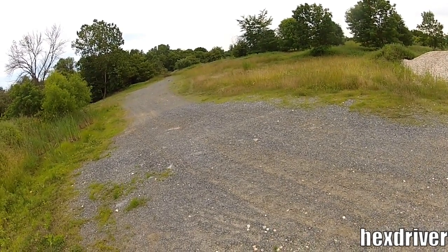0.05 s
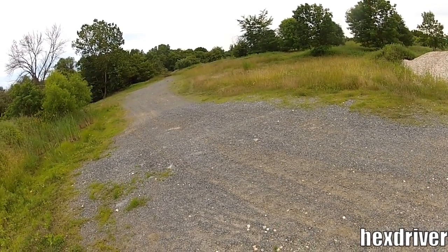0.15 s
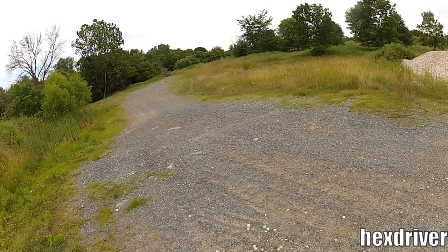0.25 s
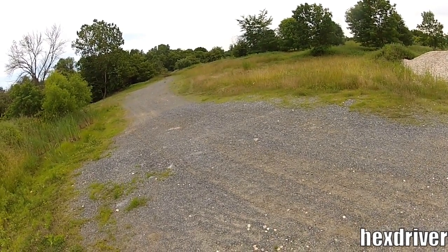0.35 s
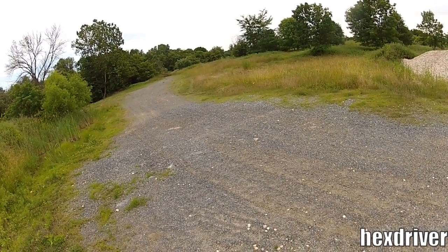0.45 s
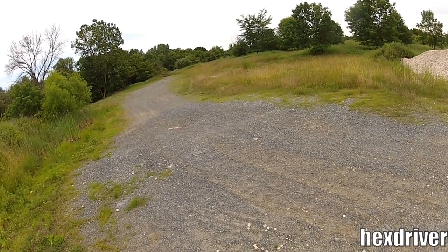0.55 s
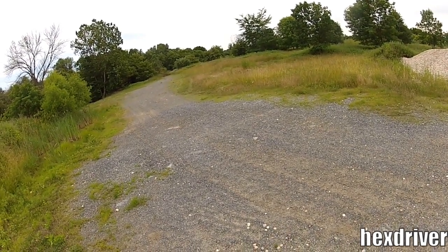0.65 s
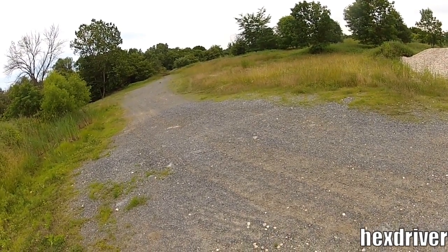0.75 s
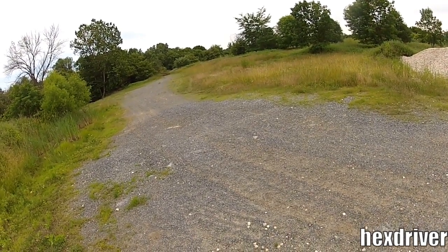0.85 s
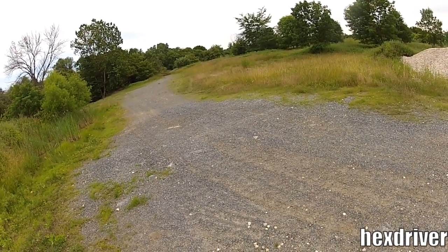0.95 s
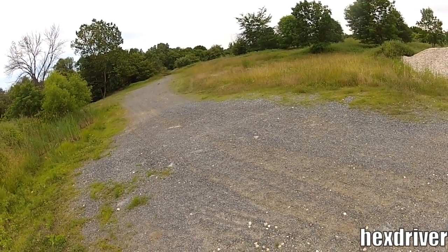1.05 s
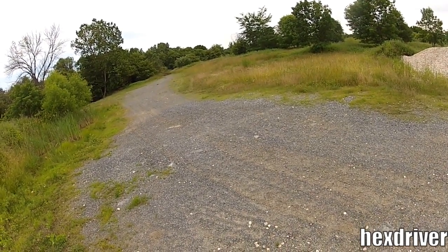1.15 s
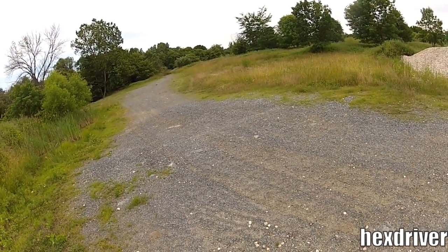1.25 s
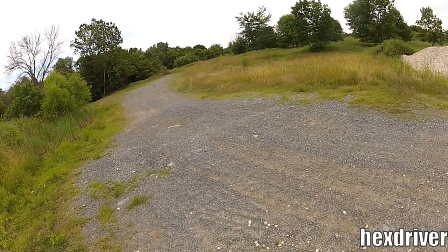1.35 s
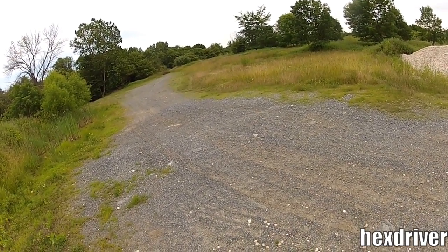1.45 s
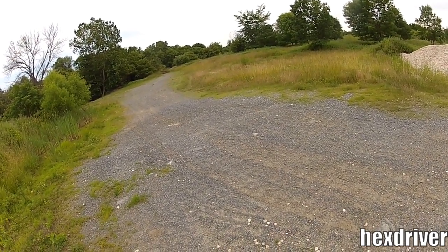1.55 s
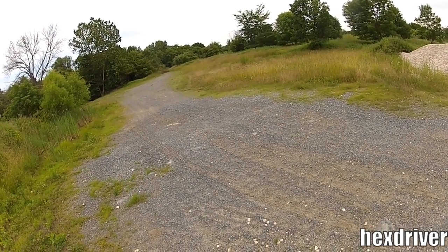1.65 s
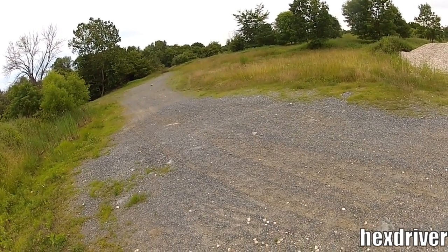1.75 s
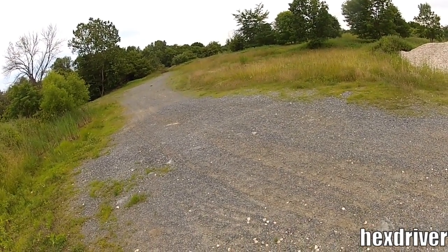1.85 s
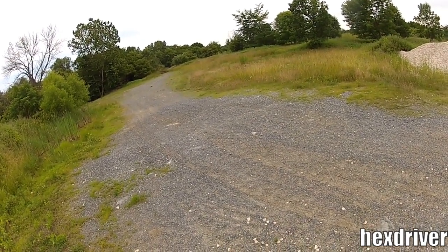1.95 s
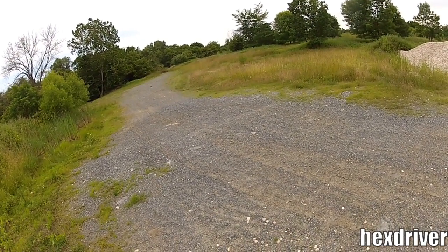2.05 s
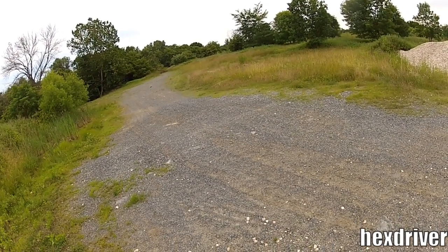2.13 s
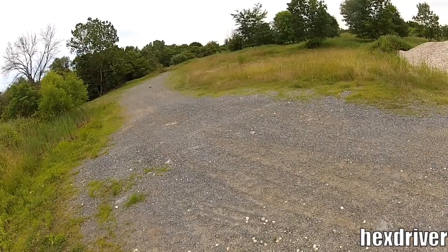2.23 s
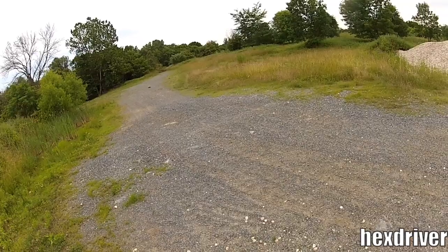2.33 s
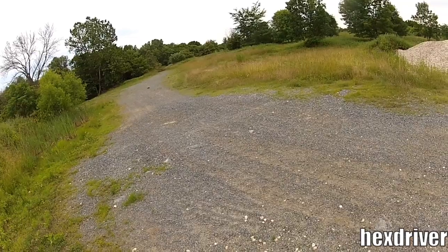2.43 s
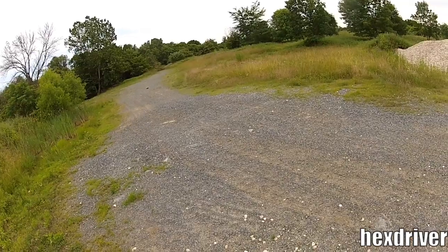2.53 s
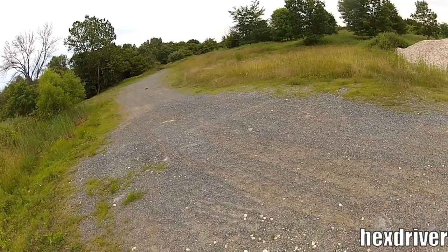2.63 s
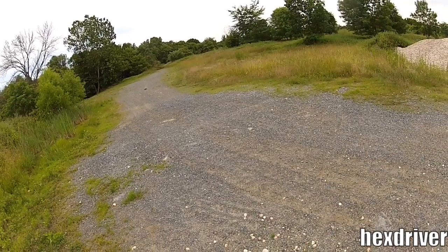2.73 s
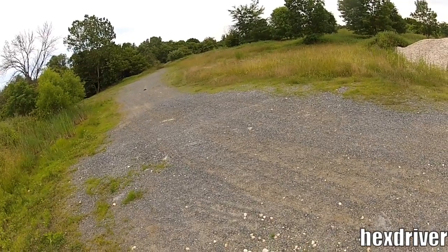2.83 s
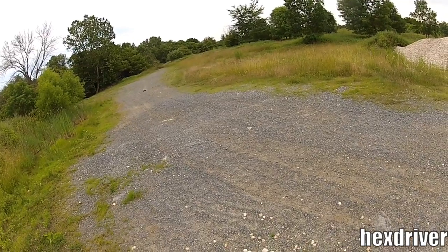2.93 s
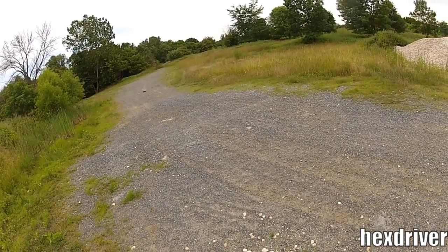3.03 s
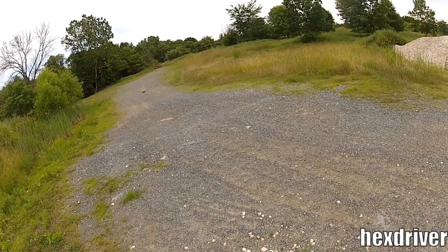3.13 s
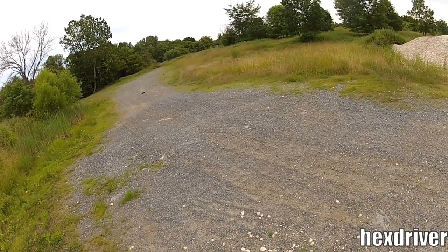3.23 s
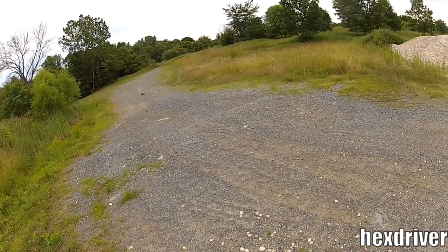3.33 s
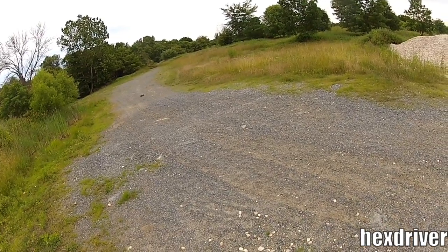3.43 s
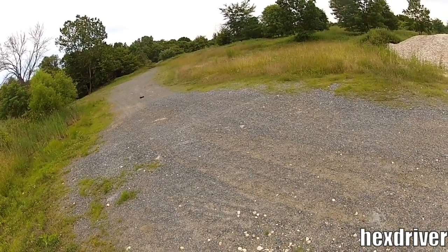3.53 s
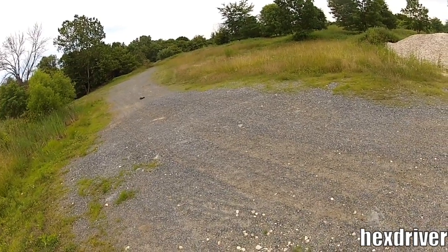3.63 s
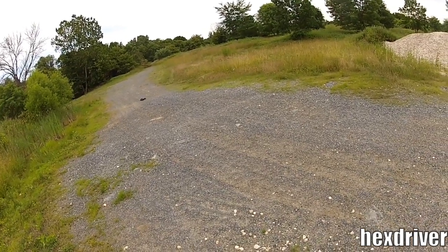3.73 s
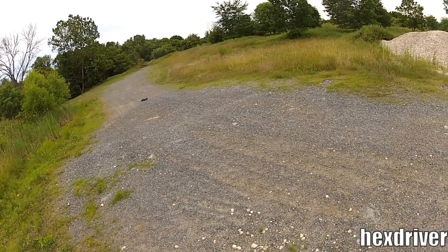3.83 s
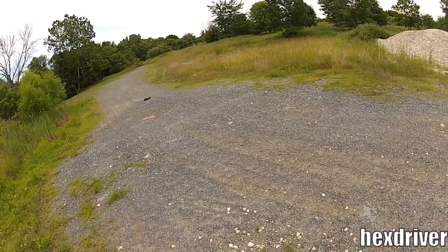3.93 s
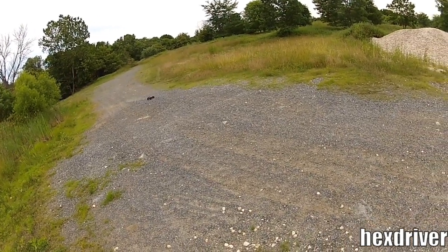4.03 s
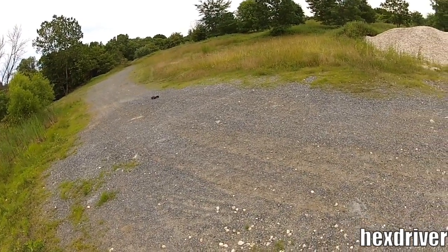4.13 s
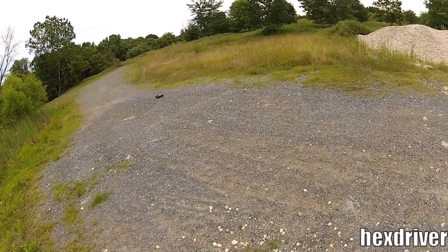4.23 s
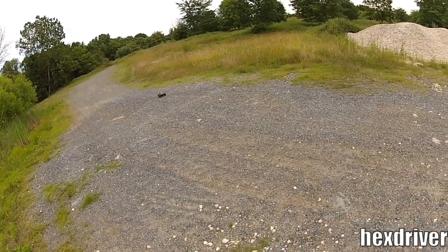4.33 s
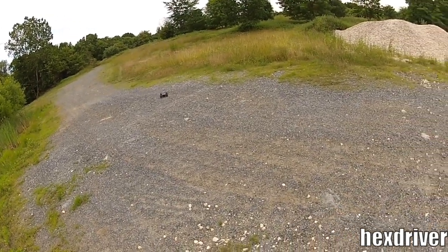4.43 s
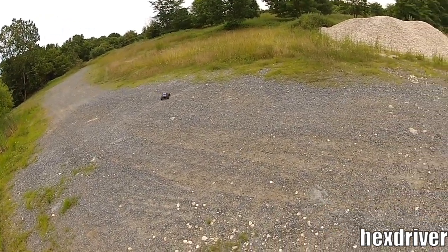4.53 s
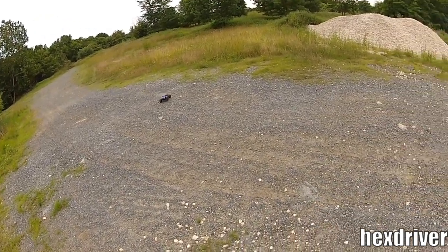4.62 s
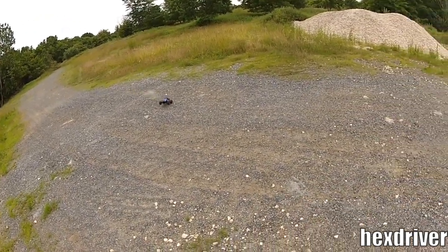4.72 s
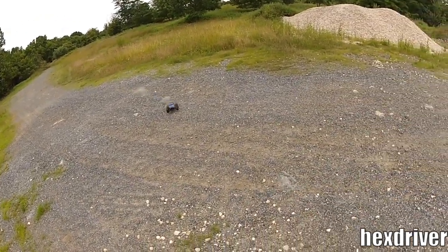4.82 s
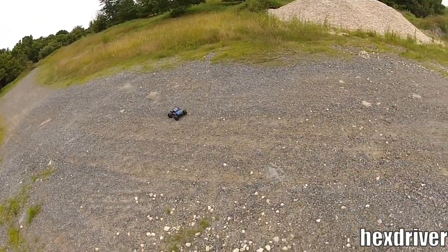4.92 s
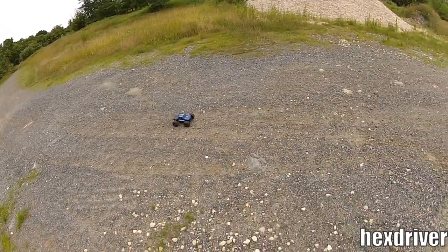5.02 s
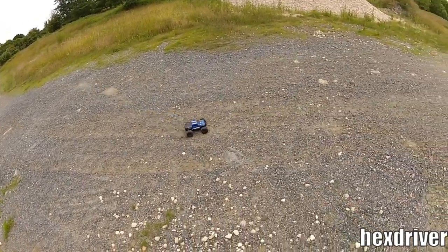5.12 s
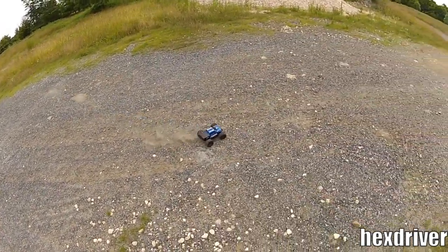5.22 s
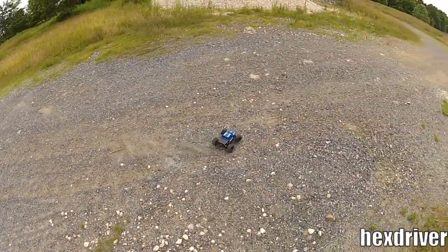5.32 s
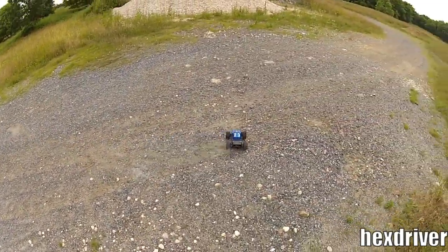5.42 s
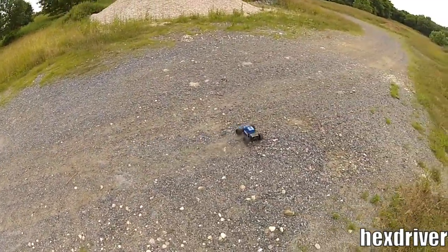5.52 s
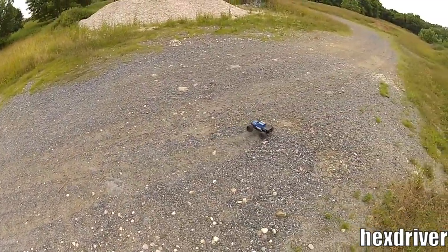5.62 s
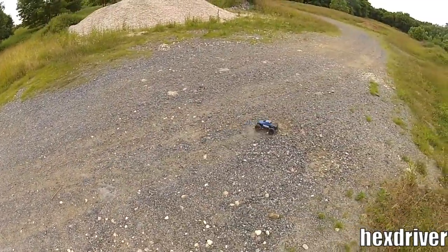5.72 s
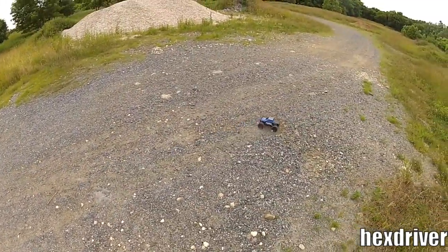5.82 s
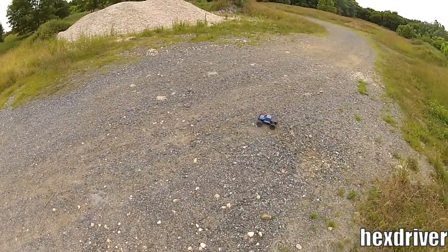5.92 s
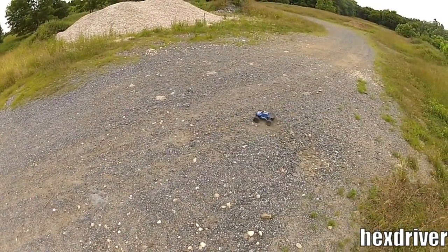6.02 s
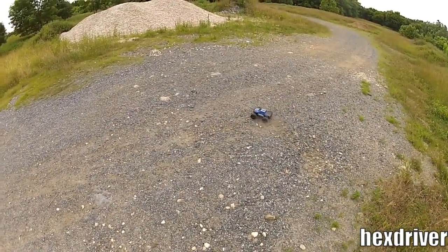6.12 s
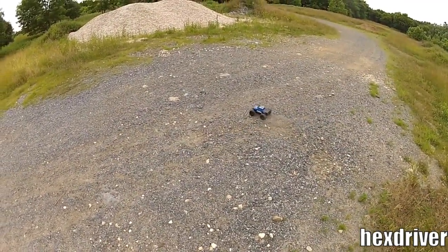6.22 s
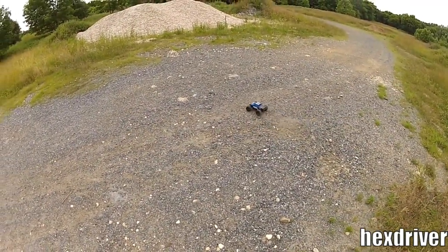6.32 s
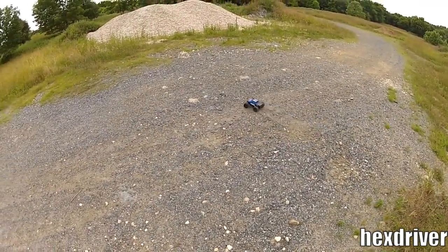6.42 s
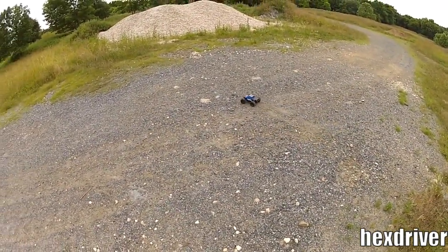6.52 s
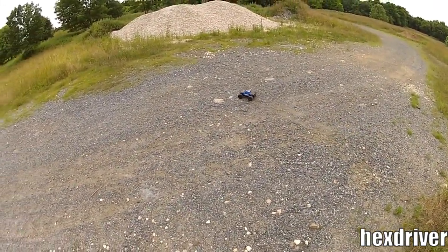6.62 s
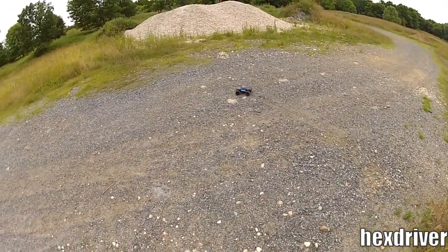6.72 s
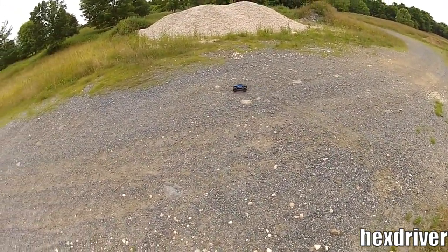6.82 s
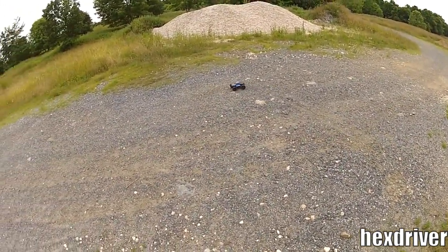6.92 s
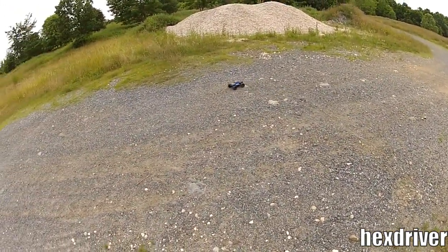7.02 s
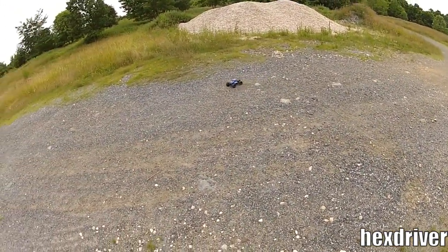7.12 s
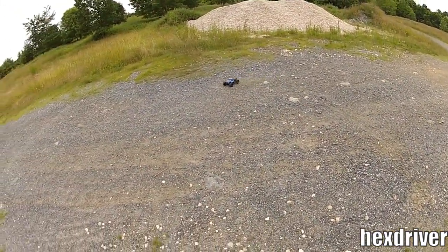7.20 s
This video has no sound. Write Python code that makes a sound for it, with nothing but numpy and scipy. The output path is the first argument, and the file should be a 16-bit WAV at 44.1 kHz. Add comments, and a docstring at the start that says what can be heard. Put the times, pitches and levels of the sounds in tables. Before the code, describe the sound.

Open field, faint low air rumble with a little insect hiss. From 0 to 2.2 s a songbird gives quick, tiny rising and falling whistles, ending in soft level calls, while a thin, very fast high trill runs until about 4.7 s, with louder double accents from 3.4 s. A faint low hum swells at the start and again around 2 s. Beneath, a small truck's hollow tyres drum softly far away, growing with light bumps from 2 s. From 4 s it rushes nearer; at 4.6 s crunch and hollow rattle jump up. Between 5 and 6.3 s it is closest: heavy stone crunch, hard short thuds at 5.1, 5.4, 5.5, 5.9 and 6.0, dry pebble snaps, brief dips as wheels hop. From 6.4 s it recedes unevenly, still rattling at 7.25 s. Dry outdoor sound, coarse camera treble.

```python
"""A small electric model truck comes in from far off over loose gravel, passes close and draws away.
Random stone contacts ring its hollow tyres and crunch under them; it hops, slams onto bumps and flings
pebbles at its chassis. Gliding whistles make a songbird and a thin trill at the field's edge, over a
faint low hum and filtered-noise open air. The camera's microphone holds each sample at a low rate."""
import sys
import numpy as np
from scipy import signal
from scipy.fft import rfft, irfft
from scipy.io import wavfile
from scipy.ndimage import map_coordinates

SR = 44100
rng = np.random.default_rng(int(sys.argv[2]) if len(sys.argv) > 2 else 0)


def wrap_up_sound(samples):
    """Save the sound to the file named by the first command line argument, as 16-bit audio."""
    columns = np.atleast_2d(samples).T
    # keep every value between -1 and 1, then stretch to whole-number steps
    tamed = np.clip(columns, -1, 1)
    steps = np.round(tamed * 32767).astype(np.int16)
    wavfile.write(sys.argv[1], SR, steps)


N = 320166
TIME = np.arange(N) / SR

# the drive, as speed and distance set it: (time [s], drumming level before trim [dB], crunch level [dB])
DRIVE = [(0, -54, -81), (1.0, -50.5, -72.5), (1.95, -48.5, -65), (2.15, -46.5, -60.5), (3.3, -41, -55),
         (3.9, -35.5, -52.5), (4.42, -37, -53), (4.65, -29, -42.5), (5.03, -31, -46.5), (5.25, -28.5, -42),
         (5.55, -27.5, -41.5), (5.75, -31, -47), (5.98, -30, -40), (6.2, -28, -42.5), (6.48, -32.5, -48),
         (6.62, -29, -45), (6.95, -36, -48), (7.26, -33, -44.5)]
# truck nearness: (time [s], share of near tyre colour [0-1], fine grit level above the crunch [dB])
NEARNESS = [(0, 0.33, -31), (3.8, 0, -17), (4.35, 0.38, -11.5), (4.8, 0.93, -9), (5.1, 0.68, -7),
            (5.45, 1, -2.5), (5.8, 0.47, 1), (6.1, 0.9, -7.5), (6.35, 0.57, -5), (6.7, 0.54, -4.5),
            (7.26, 0.53, -7.5)]
# hops: (take-off time [s], landing time [s], drumming level change [dB], crunch level change [dB])
HOPS = [(2.399, 2.614, -5.5, -3.5), (3.276, 3.303, -8, -6), (3.515, 3.565, -13, -5.5),
        (4.07, 4.172, -5, -4.5), (4.405, 4.439, -7.5, -6), (4.547, 4.602, -10.5, -8.5),
        (4.732, 4.791, -17, -6), (4.879, 4.888, -14.5, 2), (5.59, 5.628, -9, -1.5),
        (5.657, 5.768, -8.5, -2), (5.883, 5.914, -5.5, -7), (6.54, 6.573, -16.5, -4),
        (6.868, 7.022, -3, -2), (7.073, 7.091, 1.5, 0)]
# tyres dig into loose patches: (time [s], length [s], drumming level change [dB], crunch level change [dB])
# a dig shorter than its edge reaches only part of the change
DIGS = [(1.087, 0.035, 6.5, 6), (1.27, 0.13, 4, -12.5), (1.522, 0.029, 9, 5), (1.799, 0.018, 11.5, 9),
        (2.049, 0.029, 8, -3), (2.342, 0.021, 8, 2), (2.602, 0.063, 3.5, 6.5), (3.379, 0.044, 3.5, 2.5),
        (3.486, 0.056, 6, 4.5), (3.606, 0.012, 0, 1.5), (3.792, 0.018, 1, 0), (4.291, 0.057, 9, 6),
        (4.477, 0.034, 2.5, 8.5), (4.7, 0.022, 2, 11), (4.821, 0.085, 3, 1.5), (4.92, 0.059, 1.5, 2),
        (5.158, 0.081, 6, 3.5), (5.27, 0.034, 2.5, 4), (6.093, 0.021, -3, 5), (6.561, 0.03, 3, 2),
        (7.01, 0.023, 4.5, 0)]
# wheels slam onto bumps: (time [s], peak level before trim [dB])
BUMPS = [(1.923, -30), (1.95, -30.5), (2.349, -25.5), (2.778, -25.5), (2.918, -26.5), (3.096, -29),
         (3.204, -25), (3.612, -21), (3.736, -23), (3.78, -29), (4.213, -21), (4.354, -20.5), (5.09, -12.5),
         (5.358, -10), (5.534, -12.5), (5.87, -15), (6.02, -15), (6.264, -22), (6.51, -23), (7.155, -21.5)]
# pebbles strike the chassis: (time [s], peak level before trim [dB], resonance [Hz])
PEBBLES = [(4.481, -27.5, 2110), (4.7, -28, 2440), (5.193, -22, 3300), (5.23, -18.5, 2420),
           (5.329, -18, 3700), (5.359, -25.5, 2800), (5.5152, -15.5, 4080), (5.552, -21.5, 3120),
           (5.58, -27, 2840), (5.695, -37, 3030), (5.796, -18, 3200), (5.779, -29, 2860),
           (5.909, -29, 4420), (6.022, -23.5, 2480), (6.11, -26.5, 4730), (6.362, -38, 4400),
           (6.867, -22, 2740)]
# ring of the hollow tyres, close to the microphone: (frequency [Hz], relative level [dB])
TYRE_NEAR = [(30, -37), (70, -25), (130, -15.5), (200, -11.5), (270, -7), (325, -2), (385, -1), (460, -3),
             (540, -7), (660, -9), (800, -14), (1050, -15.5), (1500, -27), (2500, -45)]
# ring of the hollow tyres, far off: (frequency [Hz], relative level [dB])
TYRE_FAR = [(30, -26), (100, -12), (200, -5.5), (280, -4), (325, 1), (380, 1.5), (470, -7), (560, -5.5),
            (680, -7), (850, -15), (1050, -25.5), (1500, -29.5), (2500, -48)]
# colour of stones grinding on each other: (frequency [Hz], relative level [dB])
CRUNCH = [(500, -15), (950, 3), (1300, 3), (1700, -6), (2050, 0.5), (2500, 4.5), (2900, 1.5), (3200, -4),
          (3600, -18), (4200, -24), (5800, -29)]
# colour of the finest grit: (frequency [Hz], relative level [dB])
GRIT = [(2500, -29), (3400, 0), (4100, -2.5), (4500, -0.5), (5000, -2.5), (5500, -12), (6000, -10)]
# reflection off the ground: (time [s], lag [ms], reflected share [0-1])
GROUND = [(0, .7, .2), (3.8, .76, .35), (4.35, .79, .5), (4.8, .82, .5), (5.1, .87, .5), (5.5, .87, .5),
          (5.8, .86, .2), (6.1, .85, .3), (6.35, .68, .2), (6.7, .72, .45), (7.0, .76, .55),
          (7.26, .77, .45)]
# pitches that every songbird sweep runs between: (low [Hz], high [Hz])
SONG_HZ = (3095, 4900)
# songbird's rising sweeps: (time [s], length [s], middle pitch [Hz], level [dB])
UPSWEEPS = [(0.73, .03, 3640, -63), (.757, .02, 3900, -64), (.886, 0.024, 4150, -61),
            (1.122, .025, 4250, -58.5), (1.309, .031, 4200, -56), (1.682, 0.034, 3700, -58),
            (1.875, .034, 3850, -59)]
# songbird's falling sweeps: (time [s], length [s], middle pitch [Hz], level [dB])
DOWNSWEEPS = [(.209, .047, 4150, -59), (0.5, .045, 4220, -59), (1.174, 0.048, 3680, -57.5),
              (1.371, .042, 3650, -59.5), (1.65, .045, 4340, -61), (1.694, 0.016, 4020, -57),
              (1.893, .015, 4100, -60)]
# soft, level calls that end the song: (time [s], length [s], pitch [Hz], level [dB])
SOFT_CALLS = [(2.058, .024, 4050, -61), (2.11, 0.028, 3230, -62), (2.21, .05, 3340, -67)]
# thin, fast trill in the grass: (time [s], syllable rate [1/s], level before scatter [dB])
TRILL = [(0, 26, -60), (1.0, 27, -62.5), (1.8, 31, -60.5), (2.4, 28, -62), (3.0, 27.7, -58.5),
         (3.6, 28, -59.5), (4.4, 24, -64), (4.7, 22, -64)]
# the trill's accents, two loud syllables each: (time [s], level [dB])
ACCENTS = [(3.421, -54.5), (3.739, -52.5), (4.047, -52.5), (4.299, -50), (4.59, -51)]
# low, distant hum: (time [s], length [s], start [Hz], middle [Hz], end [Hz], level before wavering [dB])
HUM = [(0.0, 0.573, 65.3, 76.2, 79, -51), (1.706, 0.89, 94.3, 100.8, 88.5, -55)]
# colour of the open air: (frequency [Hz], relative level [dB])
AIR = [(20, -13), (40, -7.5), (65, 0.5), (90, -0.5), (130, -3.5), (220, -8), (400, -21.5), (700, -23.5),
       (1100, -41), (2000, -29), (3700, -35.5), (4500, -32.5), (5050, -23.5), (5500, -27.5), (6000, -32.5)]


def rolling(clump_db=3, fine_clump_db=2.5, jolt_db=1.85, bounce_db=1.1, drumming_trim_db=0.5):
    """Stones drum on the hollow tyres and grind on each other; the jolting wheel load drives both."""
    drum_db, crunch_db = wheel_load()
    load = undb(jolt_db * walk(55))
    near = curve(NEARNESS).clip(0, 1)
    knocks = contacts(rate=3000, spread_db=2)
    near_tyres = near * unit(ring(knocks, TYRE_NEAR))
    far_tyres = (1 - near) * unit(ring(knocks, TYRE_FAR))
    # the soft tyres bounce on the uneven ground
    bounce = bounce_db * walk(36).clip(-2, 1.5)
    drumming = (near_tyres + far_tyres) * undb(drum_db + bounce + drumming_trim_db)
    # stones give way in small clumps, each a few milliseconds long
    clumps = undb(clump_db * walk(260).clip(-2.2, 2.2))
    crunch = unit(ring(contacts(rate=4500, spread_db=1.5) * clumps, CRUNCH))
    # the finest ticks only carry over a short distance
    fine_clumps = undb(fine_clump_db * walk(330).clip(-2.2, 2.2))
    ticks = contacts(rate=5000, spread_db=7.0) * fine_clumps
    grit = unit(ring(ticks, GRIT)) * undb(curve(NEARNESS, axis=2))
    return load * (drumming + (crunch + grit) * undb(crunch_db))


def wheel_load(hop_edge_s=0.0058, dig_edge_s=0.02):
    """Drumming and crunch levels in dB follow the drive and change as wheels hop or dig in."""
    drum_db, crunch_db = curve(DRIVE), curve(DRIVE, axis=2)
    for start, end, drum_change, crunch_change in HOPS:
        hop = window(start, end, hop_edge_s)
        drum_db, crunch_db = drum_db + drum_change * hop, crunch_db + crunch_change * hop
    for start, length, drum_change, crunch_change in DIGS:
        dig = window(start, start + length, dig_edge_s)
        drum_db, crunch_db = drum_db + drum_change * dig, crunch_db + crunch_change * dig
    return drum_db, crunch_db


def bumps(decay_s=0.0047, rattle=0.13, landing_db=11, trim_db=-2.5):
    """A bump or landing is one firm push and a quick rattle of stones into the tyres."""
    out, t = np.zeros(N), np.arange(4096) / SR
    drive_db = curve(DRIVE)
    # before trim, a landing peaks landing_db above the drive's drumming level
    landings = [(end, np.interp(end, TIME, drive_db) + landing_db) for _, end, _, _ in HOPS]
    for start, db in BUMPS + landings:
        push = rattle * rng.standard_normal(len(t)) * np.exp(-t / decay_s)
        push[0] += 1
        # soft rubber spreads the push over about a millisecond
        soft_push = np.convolve(push, np.hanning(40))
        thud = ring(soft_push, TYRE_NEAR)
        add(out, start, thud / np.abs(thud).max() * undb(db + trim_db))
    return out


def pebbles(skid_s=0.0012, trim_db=-3):
    """Each pebble gives a dry snap: it skids and bounces for a few milliseconds on one broad resonance."""
    out, t = np.zeros(N), np.arange(1024) / SR
    skid = t * np.exp(-t / skid_s)
    for start, db, hz in PEBBLES:
        chassis = [(hz / 4, -28), (hz / 1.6, -13), (hz / 1.15, -5), (hz, 0),
                   (hz * 1.15, -7), (hz * 1.4, -17), (hz * 3, -34)]
        snap = ring(skid * rng.choice([-1, 1], len(t)), chassis)
        # start 1 ms early, as the skid takes a moment to build
        add(out, start - .001, snap / np.abs(snap).max() * undb(db + trim_db))
    return out


def ground_echo(x):
    """The gravel returns the treble inverted and a little late, so notches slide as the truck moves."""
    high_pass = signal.butter(2, 800, "high", fs=SR, output="sos")
    treble = signal.sosfiltfilt(high_pass, x)
    lag_samples = curve(GROUND) * SR / 1000
    late_treble = map_coordinates(treble, [np.arange(N) - lag_samples], order=1)
    return x - curve(GROUND, axis=2) * late_treble


def songbird():
    """A songbird whistles quick sweeps between two pitches, then soft level calls."""
    out, (low_hz, high_hz) = np.zeros(N), SONG_HZ
    for start, length, middle_hz, db in UPSWEEPS:
        add(out, start, undb(db) * whistle(length, low_hz, middle_hz, high_hz))
    for start, length, middle_hz, db in DOWNSWEEPS:
        add(out, start, undb(db) * whistle(length, high_hz, middle_hz, low_hz))
    for start, length, hz, db in SOFT_CALLS:
        add(out, start, undb(db) * whistle(length, hz, hz, hz))
    return out


def trill(pitch_scatter=0.0216, scatter_db=2.5, late_s=0.0014):
    """A run of tiny falling syllables, scattered in time, pitch and level, plus steady accents."""
    out, fall_hz = np.zeros(N), np.array([5330, 5030, 4780])
    # a syllable starts each time the running count passes a whole number
    count = np.cumsum(curve(TRILL)) / SR
    starts = np.flatnonzero(np.diff(np.floor(count)))
    starts = starts[starts < TRILL[-1][0] * SR]
    db = curve(TRILL, axis=2)
    for i, (late, pitch, loud) in zip(starts, rng.standard_normal((512, 3))):
        syllable = whistle(0.0207, *fall_hz * (1 + pitch_scatter * pitch))
        add(out, i / SR + late_s * late, undb(db[i] + scatter_db * loud) * syllable)
    for start, accent_db in ACCENTS:
        for at in start, start + 0.0425:
            add(out, at, undb(accent_db) * whistle(0.0184, *fall_hz))
    return out


def among_trees(calls, trees_db=-15, decay_s=0.053):
    """Trees scatter the calls into a faint, quickly dying tail of dense random echoes."""
    t = TIME[:SR // 2]
    trees = rng.standard_normal(len(t)) * np.exp(-t / decay_s)
    tail = signal.fftconvolve(calls, trees / np.linalg.norm(trees))[:N]
    return calls + undb(trees_db) * tail


def hum():
    """A faint, distant low tone swells twice, gliding in pitch and wavering in level."""
    out = np.zeros(N)
    for start, length, first_hz, middle_hz, last_hz, db in HUM:
        add(out, start, undb(db) * whistle(length, first_hz, middle_hz, last_hz))
    return out * undb(3 * walk(14))


def field(level_db=-49.5, waver_db=1.2):
    """Low outdoor rumble with a faint insect hiss on top: coloured noise, gently wavering."""
    return unit(ring(rng.standard_normal(N), AIR)) * undb(level_db + waver_db * walk(9.2))


def contacts(rate, spread_db):
    """Stone contacts at random moments (rate per second), with random sign and spread of size."""
    hit = rng.random(N) < rate / SR
    size = undb(spread_db * np.clip(rng.standard_normal(N), -2, 2))
    return hit * size * np.sign(rng.standard_normal(N))


def whistle(length, first_hz, middle_hz, last_hz):
    """A pure note that glides through three pitches and fades in and out."""
    u = np.linspace(0, 1, int(length * SR))
    glide = np.polyfit([0, .5, 1], [first_hz, middle_hz, last_hz], 2)
    phase = 2 * np.pi * np.cumsum(np.polyval(glide, u)) / SR
    return np.sin(phase) * signal.windows.tukey(len(u), .5)


def ring(x, colour, size=4096):
    """Pass x through a causal, minimum-phase body whose response follows (Hz, dB) points."""
    hz, db = np.transpose(colour)
    grid = np.maximum(np.fft.rfftfreq(size, 1 / SR), 1)
    gain = undb(np.interp(np.log(grid), np.log(hz), db))
    # folding the cepstrum forward in time makes the body causal
    cepstrum = irfft(np.log(gain))
    cepstrum[1:size // 2] *= 2
    cepstrum[size // 2 + 1:] = 0
    body = irfft(np.exp(rfft(cepstrum)))
    return signal.fftconvolve(x, body)[:len(x)]


def walk(rate):
    """Random values, rate per second, joined by straight lines; spread near 1."""
    return 1.2 * np.interp(TIME * rate, np.arange(4096), rng.standard_normal(4096))


def curve(rows, axis=1):
    """One column of a table, joined by straight lines in time."""
    rows = np.array(rows)
    return np.interp(TIME, rows[:, 0], rows[:, axis])


def window(start, end, edge_s):
    """Rise and fall between two moments, with sloping edges centred on them."""
    return np.clip(np.minimum(TIME - start, end - TIME) / edge_s + .5, 0, 1)


def add(out, start, sound):
    """Mix a short sound in at its time in seconds."""
    i = max(int(start * SR), 0)
    out[i:i + len(sound)] += sound[:max(N - i, 0)]


def undb(db):
    """Decibels to gain."""
    return 10 ** (np.asarray(db) / 20)


def unit(x):
    """Scale to rms 1."""
    return x / np.sqrt(np.mean(x ** 2))


def scene():
    """Truck on the gravel, calls at the field's edge, hum and open air at one microphone."""
    truck = ground_echo(rolling() + bumps() + pebbles())
    calls = among_trees(songbird() + trill())
    return (truck + calls + hum() + field())[None]


def record(dry, hold_hz=12000, top_hz=15350):
    """The camera samples slowly and holds each value, mirroring sound into the treble; the top is cut."""
    slow = signal.resample_poly(dry, hold_hz, SR, axis=1)
    # eight equal values in a row draw each held step
    steps = np.repeat(slow, 8, axis=1)
    held = signal.resample_poly(steps, SR, 8 * hold_hz, axis=1)[:, :N]
    low_pass = signal.ellip(10, .2, 70, top_hz, fs=SR, output="sos")
    return signal.sosfilt(low_pass, held)


dry = scene()
out = record(dry)
wrap_up_sound(out)
```